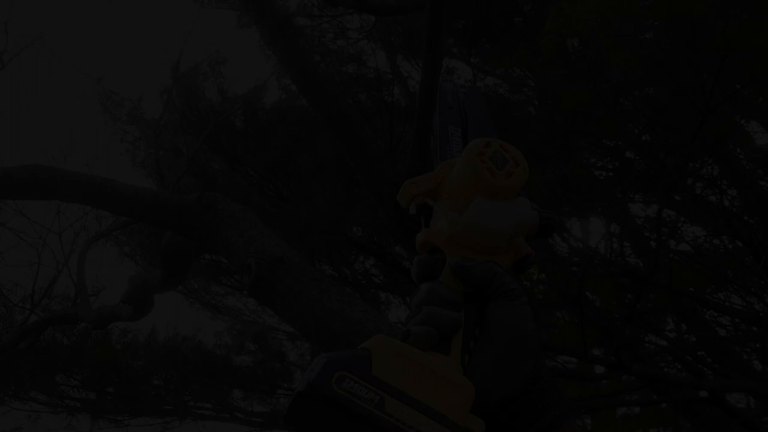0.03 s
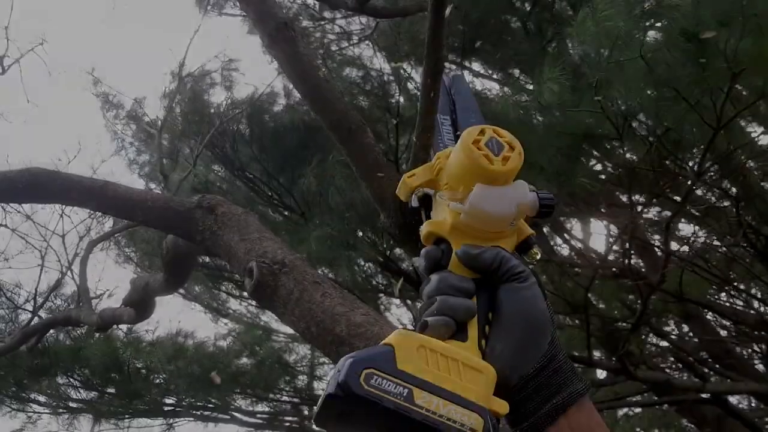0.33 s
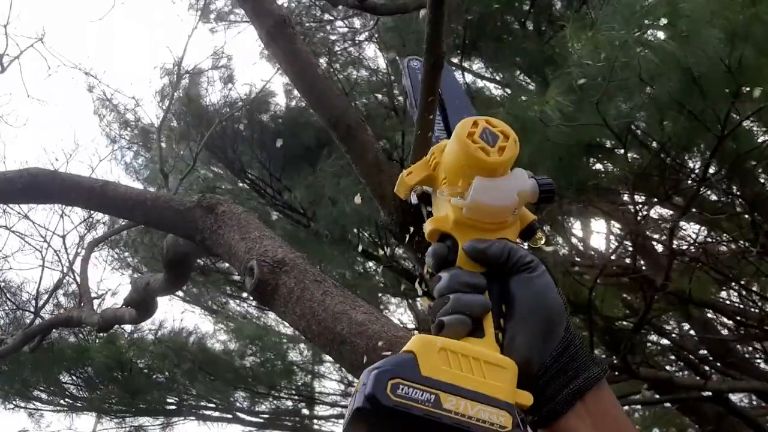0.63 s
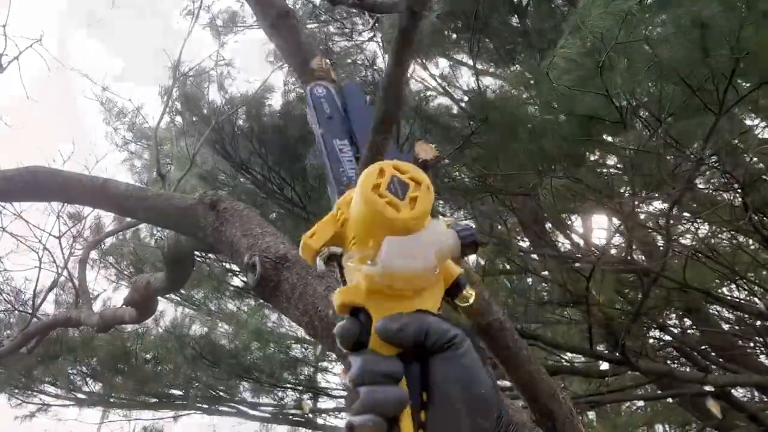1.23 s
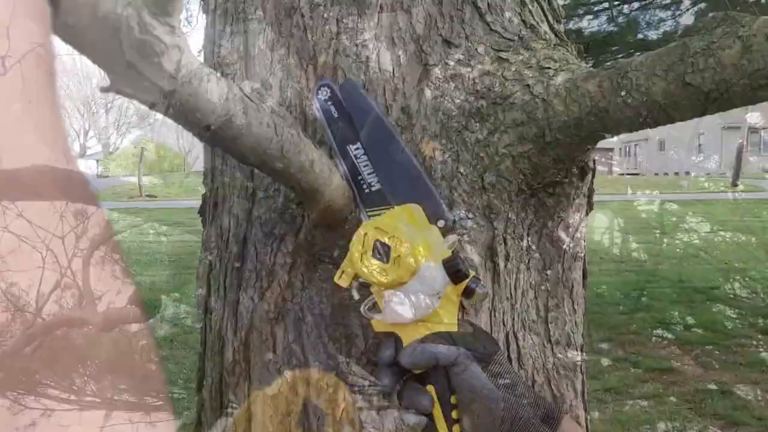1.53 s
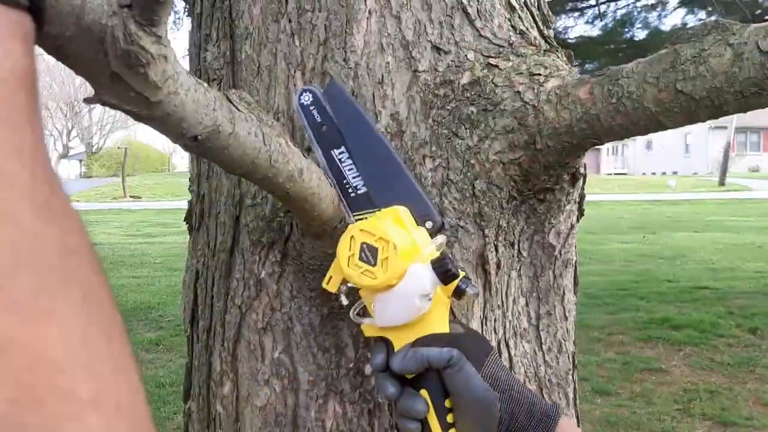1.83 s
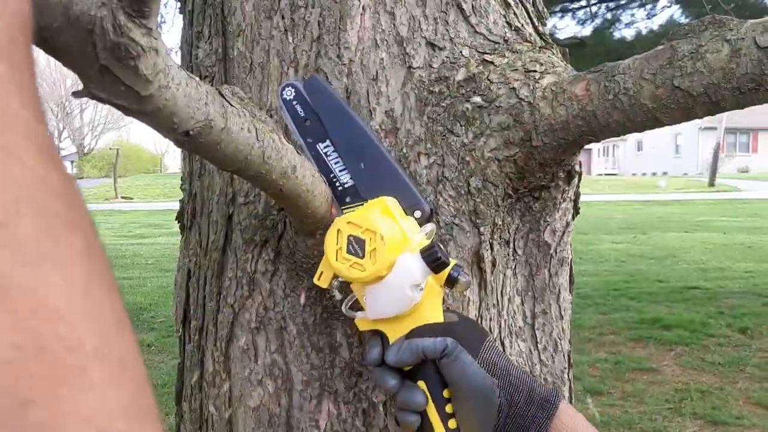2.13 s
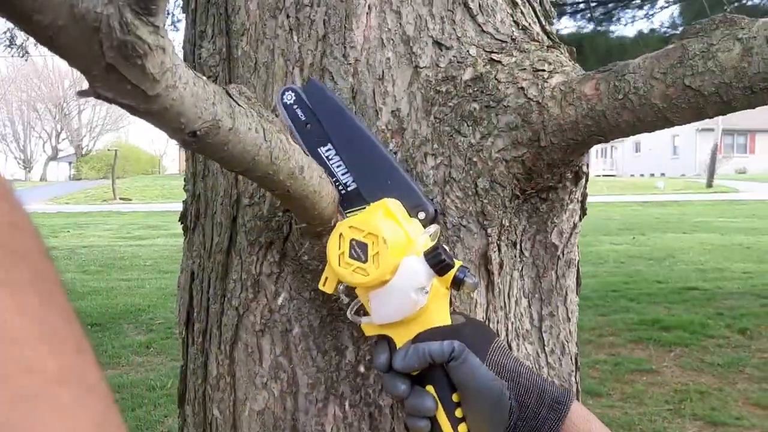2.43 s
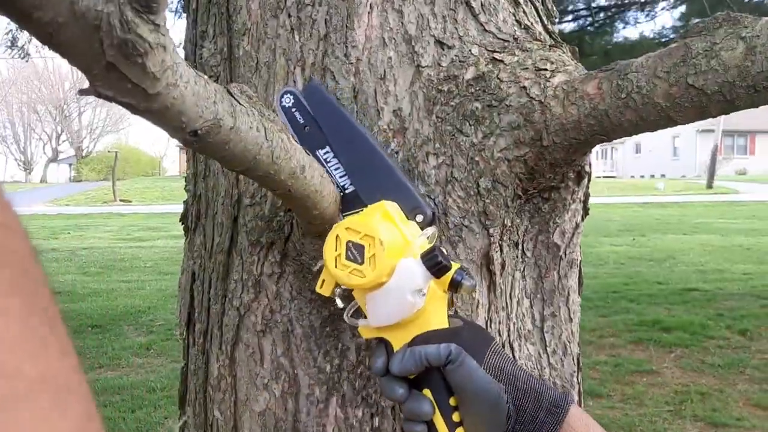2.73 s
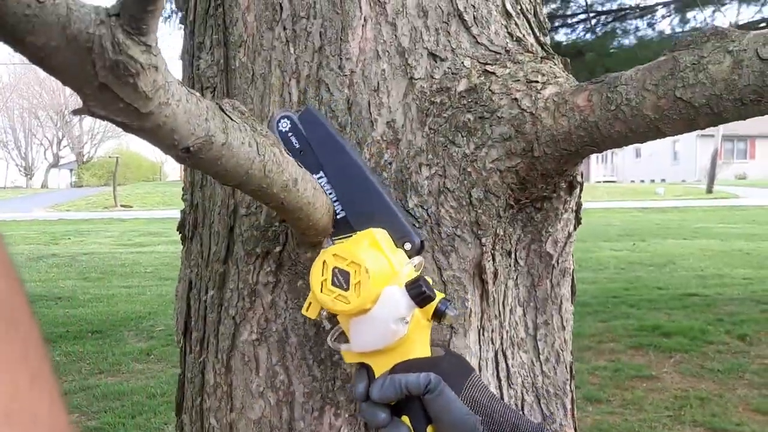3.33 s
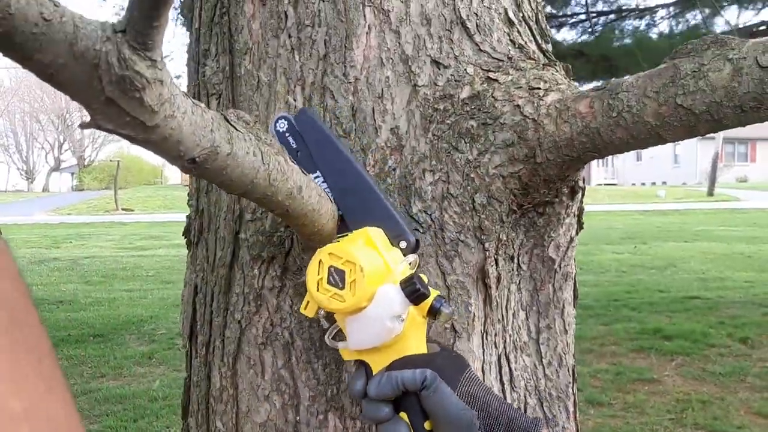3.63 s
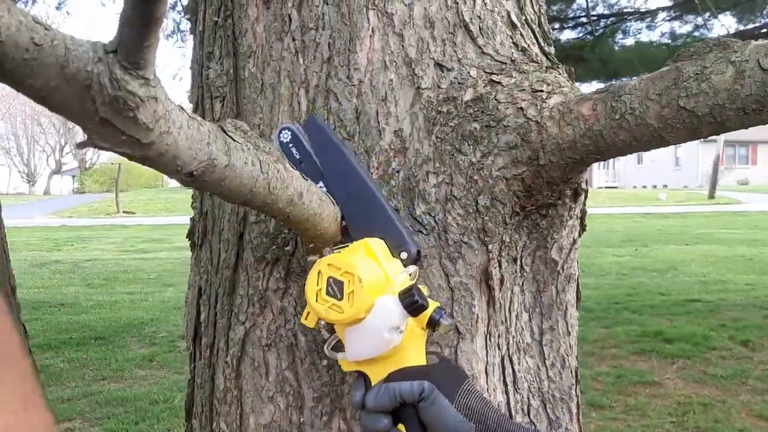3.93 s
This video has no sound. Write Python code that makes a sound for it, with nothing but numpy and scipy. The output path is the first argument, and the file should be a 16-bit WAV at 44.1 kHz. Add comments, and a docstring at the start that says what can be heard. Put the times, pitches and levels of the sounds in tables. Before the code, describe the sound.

A small battery chainsaw whirs and rasps through a thin branch with a few wood cracks, then spins up into a thick limb, rattling and knocking. Light puffs of wind hit the close microphone outdoors.

```python
"""Under a tree, a small battery chainsaw cuts a thin branch overhead, then, after a cross-fade, spins up
and bites into a thick limb. Chain links rattle on the bar, teeth rasp in the wood and the gears whine,
all driven by the sprocket speed. In the heavy cut the chain knocks once a turn, ringing the bar, and
the trunk throws back a dull echo. Wood cracks now and then, and puffs of air buffet the close microphone."""
import sys
import numpy as np
from scipy import signal
from scipy.fft import rfft, irfft
from scipy.io import wavfile

SR = 44100
rng = np.random.default_rng(int(sys.argv[2]) if len(sys.argv) > 2 else 0)


def store_wav(level_fs):
    """Save 16-bit WAV to argv[1]."""
    pcm = np.round(np.clip(np.atleast_2d(level_fs), -1, 1) * 32767)
    wavfile.write(sys.argv[1], SR, pcm.T.astype(np.int16))


N = 176400

LINKS_PER_TURN, LINK_SCATTER_DB, JITTER_S = 6, 5, .0005
FLICKER_DB = 2.2  # unsteady level of the gear whine and the singing bar


def branch_cut():
    """A light cut: even rattle, and a whine that emerges mid-cut and sags under load."""
    # sprocket speed: t/s, speed/(turns/s)
    sprocket = [(.22, 39), (.34, 45), (.67, 45.3), (.8, 50.2), (.93, 51), (1.0, 48), (1.04, 42),
                (1.115, 40.5), (1.165, 52), (1.2, 49.3), (1.32, 54.5)]
    # loudness of the chain: t/s, rattle level/dB, treble level/dB
    levels = [(.06, -45.5, -49), (.17, -32, -35.5), (.46, -20, -24.5), (.8, -23.5, -25), (1.1, -22, -23.5),
              (1.35, -24, -33.5), (1.46, -27.5, -25)]
    # colour of bar, housing and wood: f/Hz, gain/dB
    body = [(280, -21.5), (440, -8.5), (700, -10.5), (1100, -2.5), (1400, -8.5), (1850, -10), (2450, -17.5),
            (3400, -6), (4080, 1.5), (5050, -18), (7200, -10.5), (8500, -33.5), (10500, -19.5),
            (15600, -14.5)]
    # stereo width: f/Hz, side gain/dB
    width = [(1000, -12.5), (2100, -3.5), (4100, -10), (5200, -1), (7000, -6.5), (15000, -1.5)]
    speed = curve(sprocket)
    rattle = chain(speed, levels, body, width, decay_s=0.0019, low_hz=200)
    whine = gears(speed) * swell(at_s=.95, length_s=.85)
    return rattle + sizzle() + (whine + singing_bar()) * undb(curve(levels))


def limb_cut(whine_db=-5.5):
    """A heavy cut: the chain rattles, jumps and knocks over the labouring gears."""
    # sprocket speed: t/s, speed/(turns/s)
    sprocket = [(1.48, 21.82), (1.88, 43.96), (2.1, 53.5), (2.28, 55.6), (2.45, 49.93), (2.7, 46.58),
                (3.03, 55), (3.42, 43.43), (3.58, 50.52), (4, 43.88)]
    # loudness of the chain: t/s, rattle level/dB, treble level/dB
    levels = [(1.58, -32, -33.5), (1.85, -26, -27), (2.202, -25, -26), (3.1, -24.5, -26.5), (4, -24, -28.5)]
    # colour of bar, housing and wood: f/Hz, gain/dB
    body = [(540, -18), (730, -4), (1650, -2.5), (2520, -15.5), (3020, -5), (3700, -6.5), (4400, -0.5),
            (5080, -12.5), (7700, -13.5), (8650, -28.5), (12000, -13), (15600, -11)]
    # stereo width: f/Hz, side gain/dB
    width = [(1200, -8.5), (2100, 0), (4000, -4), (7000, 3.5), (15000, -3)]
    speed = curve(sprocket)
    rattle = chain(speed, levels, body, width, decay_s=0.00085, low_hz=410)
    saw = rattle + gears(speed) * undb(curve(levels) + whine_db)
    return knocks(speed) + saw + trunk_echo(saw)


def chain(speed, levels, body, width, decay_s, low_hz, treble_hz=5130, lag_share=0.15):
    """Links strike the bar in turn over the rasp of the teeth; the treble is smoother than the rattle."""
    links = beats(LINKS_PER_TURN * np.cumsum(speed) / SR, JITTER_S, LINK_SCATTER_DB)
    strikes = unit(fade(links, decay_s))
    grit = rng.standard_normal((2, N)) * undb(walk(150) + 0.99 * walk(60))
    out = 0
    for column, steady_rasp, kind in ((1, 1.3, "low"), (2, 2.2, "high")):  # rattle, then treble
        rasp = colour(grit * np.hypot(strikes, steady_rasp), body)
        rasp = band(rasp, treble_hz, kind, order=8)
        mid, side = band(rasp, low_hz, "high")
        # part of the width is a phase lag between the microphone ports
        side = np.sqrt(1 - lag_share) * side - np.sqrt(lag_share) * signal.hilbert(mid).imag
        layer = stereo(mid, widen(side, width)) / np.std(mid)
        out = out + layer * undb(curve(levels, column))
    return out


def knocks(speed, tick_db=-5):
    """The chain knocks once a turn, loose links tick in between, and now and then a tooth catches hard."""
    # strength of the knock on each turn: t/s, level/dB
    levels = [(1.5, -34), (2.05, -31.5), (2.7, -28), (4, -27.5)]
    # hard knocks where a tooth catches in the wood: t/s, level/dB
    catches = [(1.5369, -15.5), (1.6506, -12), (1.6837, -13), (1.7114, -13), (1.8705, -9.5), (1.899, -8),
               (2.1221, -10), (2.2866, -8), (2.6983, -10), (2.9915, -6), (3.3198, -6), (3.4562, -6.5),
               (3.5188, -4.5), (3.6414, -8), (3.782, -6)]
    t = np.arange(N) / SR
    catch_s, catch_db = np.array(catches).T
    turns = np.cumsum(speed) / SR
    # the sprocket slips a little, so that each catch falls on a whole turn
    slip = np.unwrap(np.interp(catch_s, t, turns), period=1)
    turns = turns - np.interp(t, catch_s, slip)
    no_catch = ~np.isin(np.round(turns), np.round(np.interp(catch_s, t, turns)))
    steady = unit(bar(beats(turns, JITTER_S, scatter_db=2.4) * no_catch))
    ticks = unit(bar(beats(LINKS_PER_TURN * turns, JITTER_S, LINK_SCATTER_DB))) * undb(tick_db)
    hard = bar(pulses(catch_s, undb(catch_db)))
    return (steady + ticks) * undb(curve(levels)) + hard


def bar(blows, contact_s=0.0016, scrape_gain=0.31):
    """Each blow rings the bar; a brief scrape makes left and right a little different."""
    # modes of the bar: f/Hz, t60/s, level/dB
    modes = [(1470, 0.003, -11), (4153, 0.0096, 0), (4393, 0.0081, 4.5)]
    t = np.arange(N // 100) / SR
    ring = sum(undb(db) * np.sin(2 * np.pi * hz * t) * np.exp(-np.log(1000) * t / t60)
               for hz, t60, db in modes)
    ring *= 1 - np.exp(-t / contact_s)
    ring /= np.abs(ring).max()
    contact = fade(blows, contact_s) / np.sqrt(contact_s * SR / 2)
    scrape_mid, scrape_side = scrape_gain * contact * rng.standard_normal((2, N))
    return signal.fftconvolve(stereo(blows + scrape_mid, scrape_side), ring[None])[:, :N]


def gears(speed, waver=.007, load_db_per_speed=0.3243):
    """Rough, flickering tones locked to the sprocket; they grow louder as the load slows the motor."""
    # gear whine: f/sprocket speed, level/dB
    partials = [(19.6, -14.5), (26, -15), (40, -12.5)]
    phase = 2 * np.pi * np.cumsum(speed * (1 + waver * (walk(50) + walk(400)))) / SR
    load_db = load_db_per_speed * (np.median(speed) - speed)
    out = 0
    for multiple, db in partials:
        flicker_db = FLICKER_DB * (walk(25.1) + walk(250))
        out = out + undb(db + load_db + flicker_db) * np.sin(multiple * phase)
    return out


def singing_bar(hz=4070, wander=0.035, gain_db=-11):
    """The rubbing chain keeps the main resonance of the bar ringing unsteadily."""
    phase = 2 * np.pi * np.cumsum(hz * (1 + wander * walk(23))) / SR
    return undb(gain_db + FLICKER_DB * walk(120)) * np.sin(phase)


def sizzle(low_hz=13500):
    """The chain flares up brightly as it breaks through the branch and runs free."""
    # bright flares of the chain: t/s, length/s, level/dB
    flares = [(1.173, 0.031, -22), (1.342, 0.17, -23)]
    hiss = unit(band(rng.standard_normal((2, N)), low_hz, "high", order=4))
    return hiss * sum(swell(at, length) * undb(db) for at, length, db in flares)


def cracks():
    """Wood splits and tears in short bursts that start sharply and die away."""
    # breaking fibres: t/s, level/dB, decay/s, low f/Hz, high f/Hz
    splits = [(1.037, -19, 0.0099, 373, 1700), (1.105, -22.5, 0.012, 298, 1570),
              (1.188, -16, 0.008, 357, 1360), (1.355, -12.5, 0.0021, 3520, 7240),
              (3.761, -21, 0.037, 346, 1070)]
    out = 0
    for at, db, decay_s, low_hz, high_hz in splits:
        fibres = unit(band(rng.standard_normal((2, N)), [low_hz, high_hz], "band", order=3))
        mid, side = fibres * fade(pulses(np.array([at]), undb(db)), decay_s)
        out = out + stereo(mid, .5 * side)
    return out


def trunk_echo(saw, delay_s=.00388, gain_db=-12, top_hz=3000):
    """The trunk throws back one dull, early reflection."""
    return undb(gain_db) * np.roll(band(saw, top_hz, "low"), int(delay_s * SR), axis=1)


def air():
    """A turbulent draught and short puffs buffet each microphone port separately."""
    # contour of the draught: t/s, level/dB
    draught = [(.3, -41.5), (1.25, -40.5), (1.7, -32.5), (2.2, -26.5), (2.55, -34), (3.35, -28.5),
               (3.47, -41), (3.65, -25)]
    # colour of its rumble: f/Hz, gain/dB
    draught_colour = [(25, -14.5), (85, -1), (240, -5.5), (600, -14), (2000, -35)]
    # puffs on the microphone: t/s, length/s, level/dB, f/Hz
    puffs = [(1.478, 0.037, -19, 317), (1.549, 0.045, -23.5, 293), (1.609, 0.028, -24, 286),
             (1.82, 0.015, -20.5, 199), (1.982, 0.021, -17.5, 152), (2.061, 0.0097, -13, 152),
             (2.124, 0.012, -18, 98), (2.179, 0.033, -19.5, 172), (2.305, 0.0095, -14.5, 170),
             (2.34, 0.02, -20, 89.9), (2.444, 0.021, -22.5, 198), (2.654, 0.025, -22.5, 181),
             (2.712, 0.011, -25.5, 129), (2.965, 0.0097, -19, 200), (3.137, 0.008, -22.5, 160.8),
             (3.244, 0.025, -15.5, 158.4), (3.345, 0.066, -27.5, 117), (3.759, 0.0096, -11.5, 209.8),
             (3.78, 0.11, -23, 324)]
    rumble = unit(colour(rng.standard_normal((2, N)), draught_colour))
    gust_db = 4.26 * walk(40) - 1.5
    out = rumble * undb(curve(draught) + gust_db)
    for at, length, db, hz in puffs:
        swirl = unit(band(rng.standard_normal((2, N)), [hz / 2.57, hz * 1.78], "band"))
        out = out + swirl * undb(db) * swell(at, length)
    return out


def undb(db):
    """Decibels to amplitude."""
    return 10 ** (np.asarray(db) / 20)


def unit(x):
    """Scales to an RMS of 1."""
    return x / np.sqrt(np.mean(x ** 2) + 1e-18)


def curve(rows, column=1):
    """One column of a table, joined by straight lines in time."""
    rows = np.array(rows)
    return np.interp(np.arange(N) / SR, rows[:, 0], rows[:, column])


def colour(x, points):
    """Minimum-phase EQ through points of f/Hz, gain/dB."""
    hz, db = np.array(points).T
    size = 2 * N
    f = np.maximum(np.arange(N + 1) * SR / size, 1)
    gain = undb(np.interp(np.log(f), np.log(hz), db))
    cepstrum = irfft(np.log(gain))
    cepstrum[1:N] *= 2
    cepstrum[N + 1:] = 0
    return irfft(rfft(x, size) * np.exp(rfft(cepstrum)))[..., :N]


def widen(side, width):
    """Weights the left-right difference by frequency, without delay."""
    hz, db = np.array(width).T
    f = np.maximum(np.arange(N // 2 + 1) * SR / N, 1)
    return irfft(rfft(side) * undb(np.interp(np.log(f), np.log(hz), db)), N)


def band(x, hz, kind, order=2):
    """Low-, high- or band-pass filter."""
    return signal.sosfilt(signal.butter(order, hz, kind, fs=SR, output="sos"), x)


def walk(rate_hz):
    """Smooth random drift with an RMS of 1."""
    knots = rng.standard_normal(N // 10)
    return unit(np.interp(np.arange(N) / SR * rate_hz, np.arange(len(knots)), knots))


def swell(at_s, length_s):
    """A bell-shaped rise and fall."""
    return np.exp(-2 * ((np.arange(N) / SR - at_s) / length_s) ** 2)


def pulses(times, sizes):
    """One-sample clicks at the given times."""
    out = np.zeros(N)
    np.add.at(out, np.clip((times * SR).astype(int), 0, N - 1), sizes)
    return out


def beats(turns, jitter_s, scatter_db):
    """One uneven pulse at each whole turn."""
    times = np.interp(np.arange(np.ceil(turns[0]), turns[-1]), turns, np.arange(N) / SR)
    late, size = rng.standard_normal((N // 20, 2))[:len(times)].T
    return pulses(times + jitter_s * late, undb(scatter_db * np.clip(size, -2, 2)))


def fade(x, decay_s):
    """Gives each pulse an exponential tail."""
    return signal.lfilter([1], [1, -np.exp(-1 / (decay_s * SR))], x + 1e-18)


def stereo(mid, side):
    """Mid and side to left and right."""
    return np.array([mid + side, mid - side])


def scene(start_s=0.055, rise_s=0.048, change_s=1.407, crossfade_s=0.073):
    """After a quick fade-in, the light cut cross-fades into the heavy one over cracks and moving air."""
    t = np.arange(N) / SR
    blend = np.clip((t - change_s) / crossfade_s + .5, 0, 1)
    saw = np.sqrt(1 - blend) * branch_cut() + np.sqrt(blend) * limb_cut()
    fade_in = np.clip((t - start_s) / rise_s, 0, 1)
    return (saw + cracks() + air()) * fade_in


def record(dry):
    """The recorder rounds the highest peaks and cuts the top."""
    top_hz = 15720
    low_pass = signal.ellip(16, .1, 80, top_hz, fs=SR, output="sos")
    return signal.sosfilt(low_pass, np.tanh(dry))


dry = scene()
out = record(dry)
store_wav(out)
```